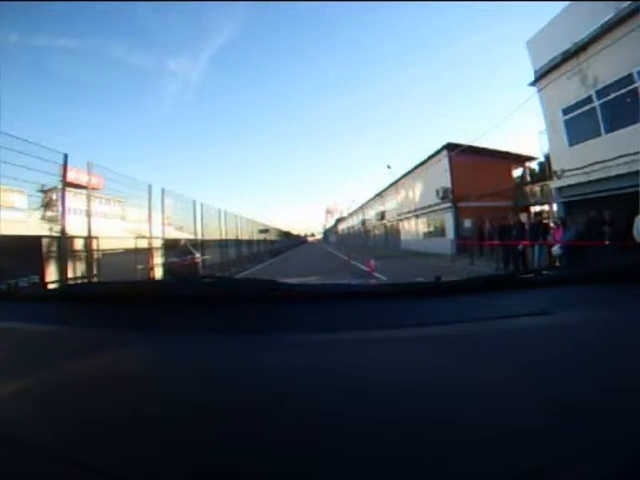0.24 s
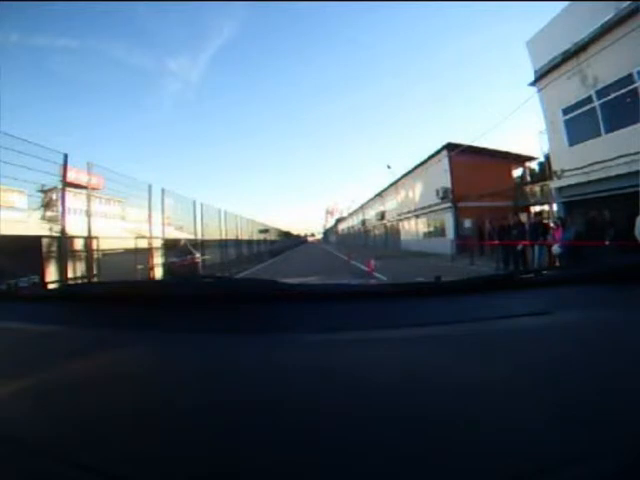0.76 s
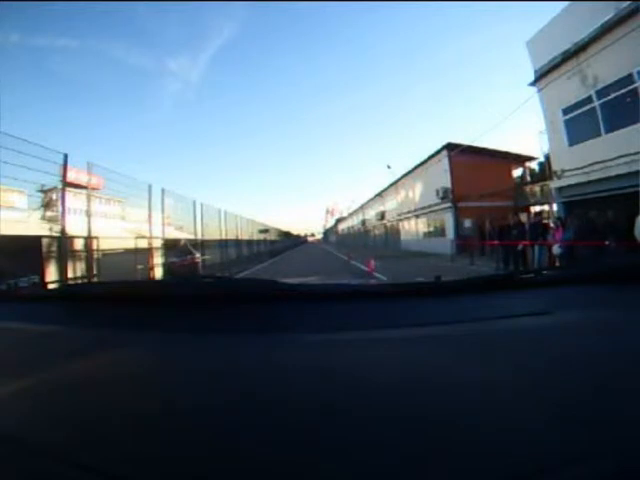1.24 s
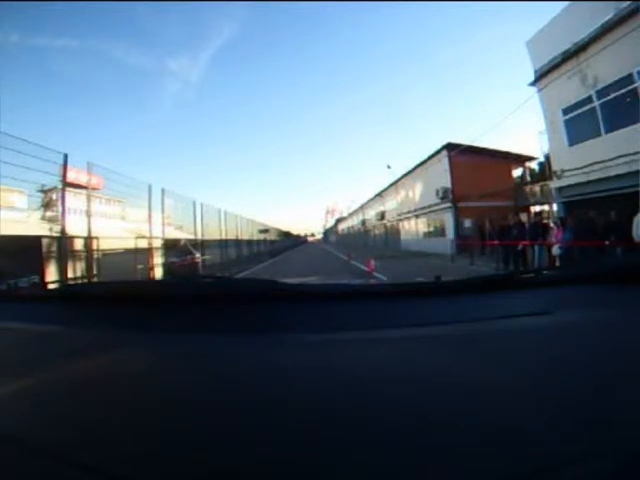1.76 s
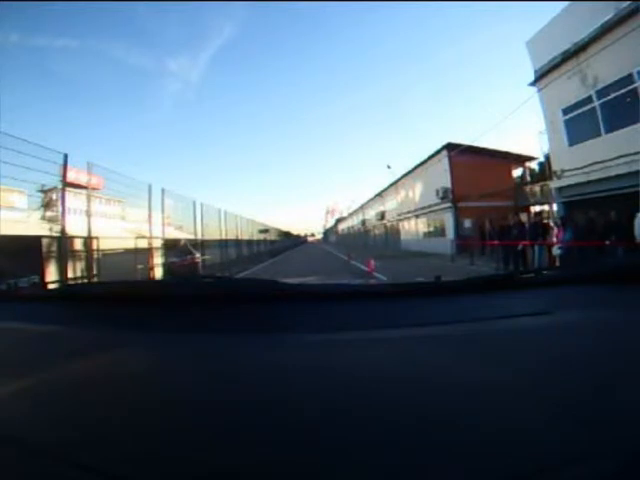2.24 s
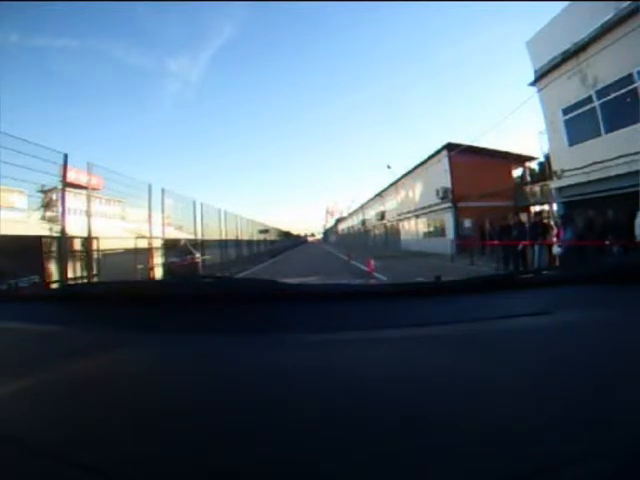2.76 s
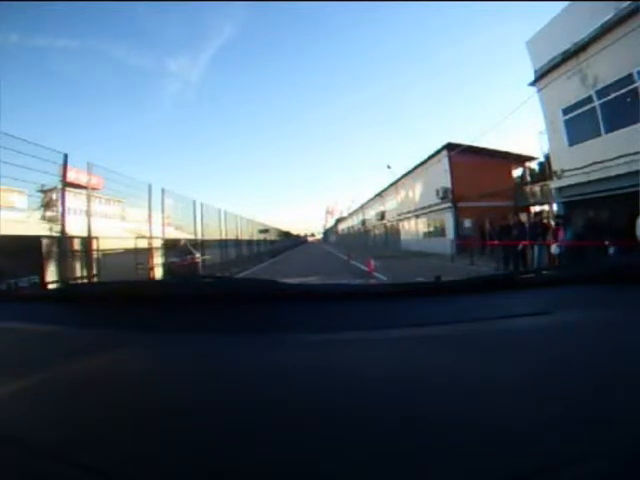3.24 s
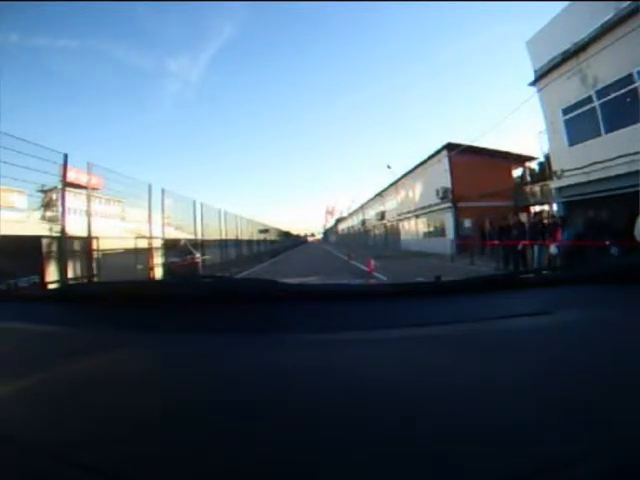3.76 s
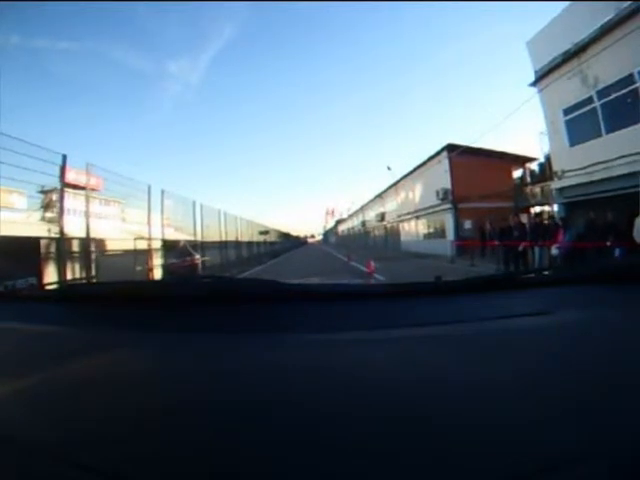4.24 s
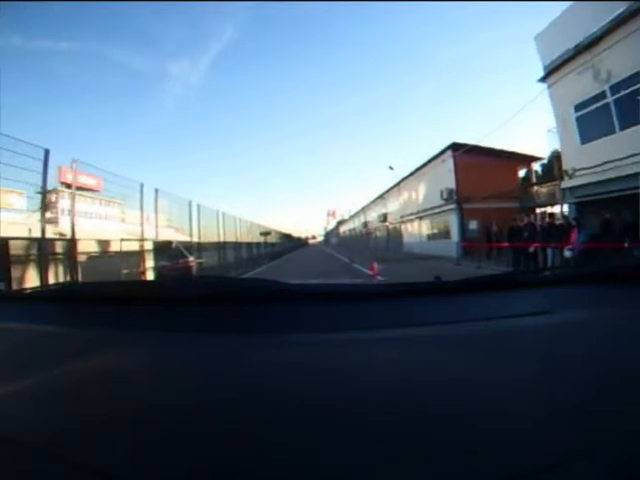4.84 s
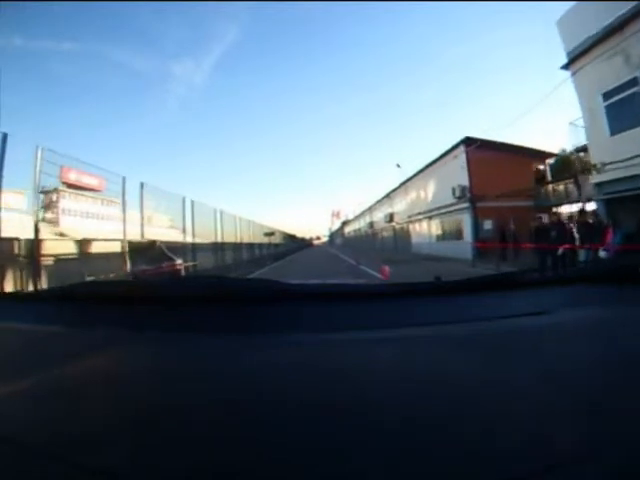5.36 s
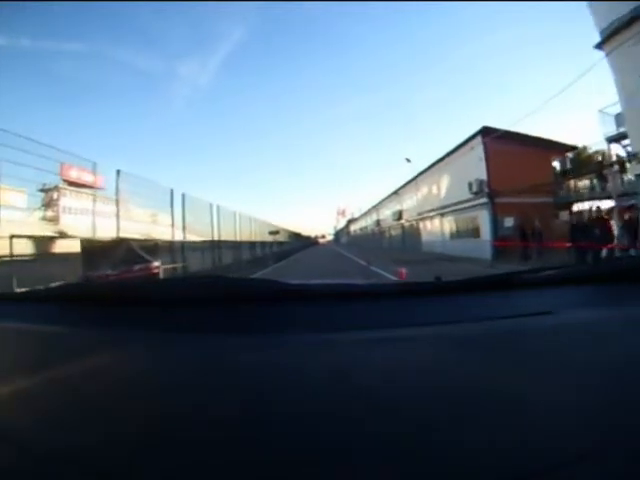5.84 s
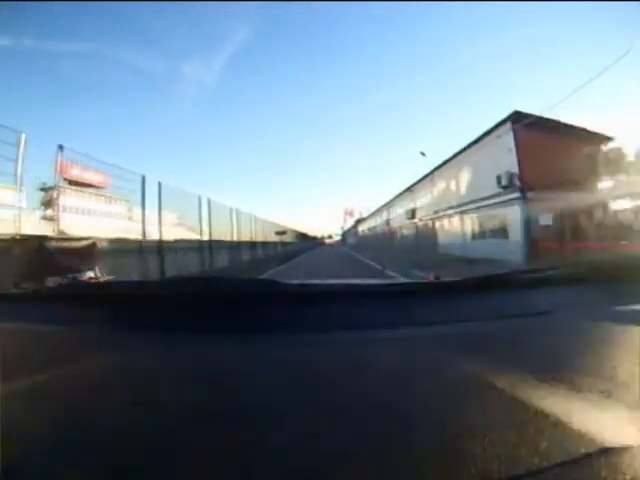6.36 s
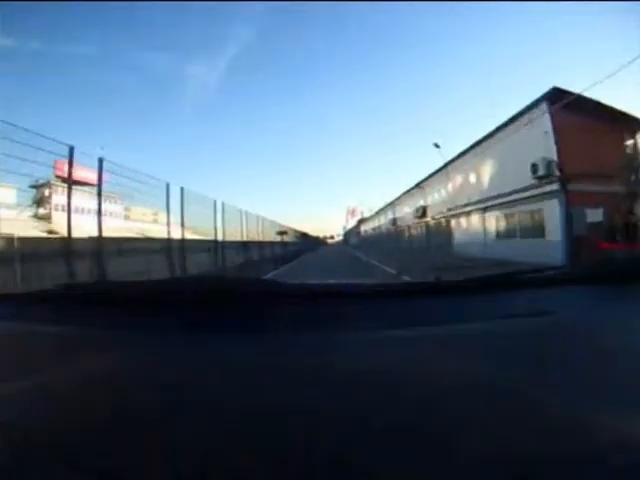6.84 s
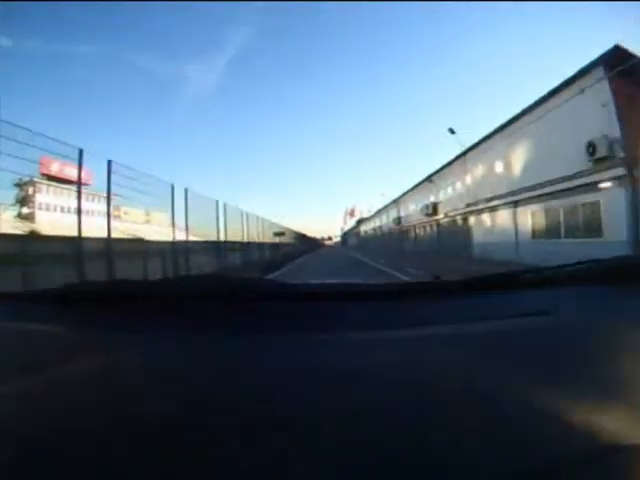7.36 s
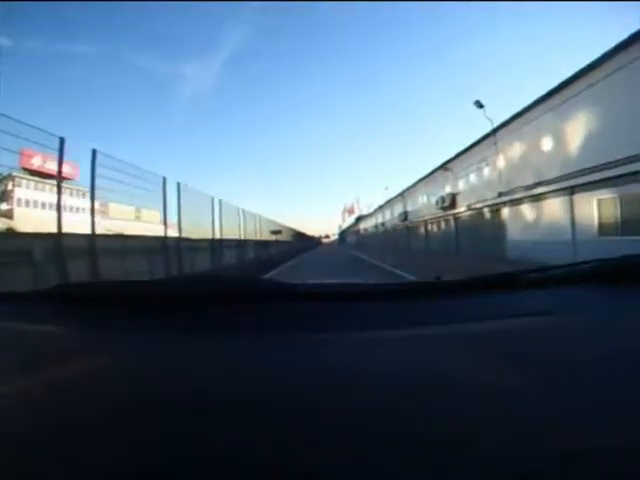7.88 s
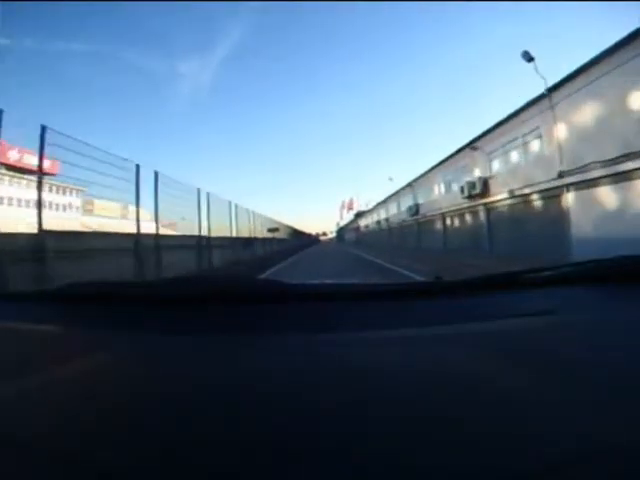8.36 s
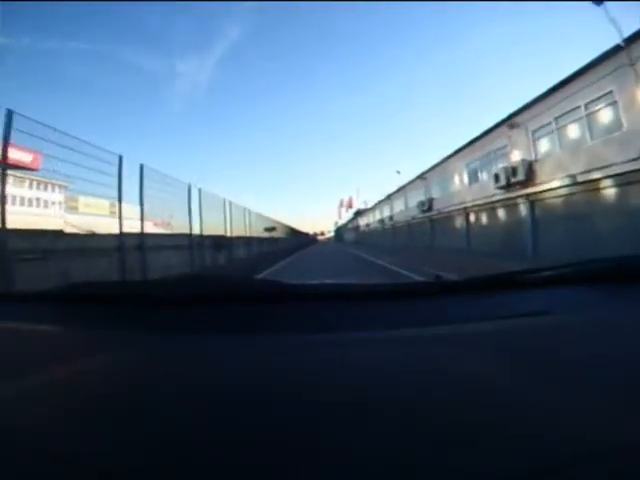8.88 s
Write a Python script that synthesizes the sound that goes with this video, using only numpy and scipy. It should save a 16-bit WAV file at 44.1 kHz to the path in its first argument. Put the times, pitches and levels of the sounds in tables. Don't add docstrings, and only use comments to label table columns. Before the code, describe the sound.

A dull, boomy cabin recording of a car waiting on a track: quiet deep idle, a second engine puttering close by, steady hiss. Dull lever knocks come first, then low clutch shudders, a quick rev and its fall with clicking trim. Acceleration follows, the engine swelling into a loud drone with road rumble and thin gear whine, rattles, repeated bumps and two hardest thumps near the end.

```python
import sys
import numpy as np
from scipy import signal
from scipy.fft import rfft, irfft
from scipy.io import wavfile
from scipy.ndimage import uniform_filter1d

SR = 44100
rng = np.random.default_rng(int(sys.argv[2]) if len(sys.argv) > 2 else 0)


def master(y):
    cut = np.clip(np.atleast_2d(y).T, -1, 1)
    pcm = np.round(cut * 32767)
    wavfile.write(sys.argv[1], SR, pcm.astype(np.int16))


def volts_from_db(level):
    exponent = np.asarray(level, float) / 20
    return 10 ** exponent


N = 401751
TIME = np.arange(N) / SR

# time_s, firing_hz
REVS = [(0, 21.5), (1.45, 21.8), (1.8, 27.8), (3.22, 28), (3.7, 50), (4.18, 67.6), (4.3, 66.8), (4.9, 47.9),
        (5.38, 36.2), (5.8, 37.7), (6.22, 47.8), (6.7, 60.7), (7.28, 83.2), (7.45, 86.5), (7.9, 103),
        (8.16, 109), (8.5, 100.7), (9.11, 79.5)]
# time_s, load_db
LOAD = [(0.0, -33), (1.34, -33.5), (1.81, -45), (3.19, -51), (3.51, -17.5), (3.77, -23), (4.46, -19),
        (4.58, -17), (5.29, -13), (5.42, -18.0), (5.91, -16), (6.25, -13.5), (6.76, -16.5), (7.16, -10),
        (7.39, -5), (8.46, -8), (8.7, -27), (9.11, -14.5)]
# level_db, load_share, unsteadiness_db, rise_db_per_octave of revs
MAIN_ORDERS = [(-0.55, 1, 1.04, 0.2), (-14, 0.67, 1.6, -1.5), (-28.5, .25, 1.1, 5), (-31.5, 0.4, 3, 9.5)]
# multiple of firing rate, level_db
MINOR_ORDERS = [(.5, -6), (1.5, 2), (2.5, -2), (3.5, 0), (4.5, -15), (5, 1.5), (5.5, -2.5), (6, 0.5),
                (6.5, -3.5), (7, -2.5), (8, -2), (9, 1)]
# freq_hz, gain_db
CABIN = [(20, 0), (120, -10.5), (170, -2.5), (210, -17), (260, -1), (305, -8.5), (340, -28), (450, -31),
         (600, -30), (780, -31), (900, -30.5)]
# freq_hz, width_hz, level_db
AIR_WITH = [(43.56, 11.6, 4), (54.1, 5.3, -5.5), (87.1, 25, -15.5), (102.4, 6.9, -14.5), (136, 8.8, -17.5),
            (171.8, 8.4, 1.3), (191.1, 11, -5.5), (220, 11, -9.5), (233, 12, -10), (246.7, 7.7, -3),
            (273.2, 12, -5.5)]
# freq_hz, width_hz, level_db
AIR_AGAINST = [(85.5, 4.3, -8), (119.8, 7.1, -14), (285, 15, -8)]
# freq_hz, density_db_per_hz
WHINE = [(2100, -29.5), (2250, -6), (2300, 1), (2360, -9.5), (2470, -1.5), (2560, -6.5), (2750, -37.5)]
# time_s, peak_db
STROKES = [(0, -31.5), (.4, -31), (.8, -30.5), (1.3, -29.5), (2, -32), (2.7, -31), (3.3, -30.5), (3.6, -41)]
# freq_hz, level_db, t60_s
STROKE_MODES = [(137, 0.5, 0.029), (260, -0.5, 0.016), (453, -5.5, 0.011), (728, -19, 0.01),
                (1060, -22, 0.021)]
# freq_hz, density_db_per_hz
RUMBLE = [(9, -34.5), (15, -15), (38, 3), (63, -2.5), (130, -2.5), (250, -3), (300, -10.5), (345, -25.5),
          (440, -25.5), (750, -29), (900, -40.5), (1300, -54)]
# freq_hz, density_db_per_hz
FIZZ = [(530, -33.5), (900, -5.5), (1250, -4.5), (1600, -5), (1850, -1.5), (2200, -5), (2470, -14.5),
        (2650, -3.5), (2920, -13), (3080, -4.5), (3400, -5.5), (3900, -12)]
# freq_hz, density_db_per_hz
HISS = [(210, -30), (350, -3.5), (423, -5), (560, -6), (658, -14.5), (691, -8), (1030, -18), (2300, -18),
        (3200, -17), (3830, -24), (4980, -53.5), (8430, -120)]
# start_s, peak_db, rebound_db
KNOCKS = [
    (1.237, -17.5, -8.5),
    (1.672, -28.5, -14.5),
    (1.688, -19, -3),
    (1.73, -27.5, -5.5),
    (8.396, -21, 4.5),
]
# freq_hz, level_db, t60_s
KNOCK_MODES = [(132.4, -8.5, 0.23), (165, 0.5, 0.064), (180, 6.5, 0.045), (232, -3, 0.089),
               (236, -22, 0.067), (748, -19.5, 0.029)]
# start_s, length_s, peak_db, ring_hz
BUMPS = [(2.801, 0.12, -22, 41.66), (2.896, 0.067, -22.5, 41.5), (2.97, .08, -28, 42.85),
         (3.05, 0.064, -34, 39.8), (3.989, 0.35, -44.5, 42), (6.8, 0.22, -27, 43.62),
         (6.992, .08, -31, 41.95), (7.075, 0.24, -24, 40.2), (7.281, 0.098, -22.5, 37),
         (7.39, 0.14, -20.5, 37.4), (7.51, 0.1, -26, 39.5), (7.614, .18, -20.5, 38.35),
         (7.799, 0.13, -23.5, 39.5), (7.887, .13, -21.5, 40.65), (8.027, .15, -21, 40.8),
         (8.168, 0.12, -23.5, 41.7), (8.286, 0.26, -21.5, 40.6), (8.483, .09, -29, 40.8),
         (8.584, 0.097, -13, 40.4), (8.663, 0.13, -11, 41.5), (8.737, 0.19, -18, 40.4),
         (8.96, 0.064, -27.5, 41.2), (9.02, 0.27, -24.5, 40.7)]
# start_s, length_s, level_db
SCUFF = (2.953, 0.038, -38.5)
# freq_hz, density_db_per_hz
SCRAPE = [(900, -19), (1700, -10), (2300, -1), (3000, -1.5), (3600, -5), (4000, -14.5)]
# start_s, peak_db
TICKS = [(4.6566, -29.5), (4.674, -29), (4.6962, -27), (4.713, -30.5), (4.7306, -29), (4.7496, -21),
         (4.79, -31.5), (4.829, -33.5), (4.8895, -24), (4.997, -33), (5.0177, -26), (5.0653, -28.5),
         (5.093, -40), (5.1173, -44), (5.1665, -32), (5.2152, -29.5), (5.24, -40), (5.259, -28.5),
         (5.293, -35), (6.2554, -26), (6.2761, -21), (8.09, -21.5), (8.115, -34), (8.1421, -33.5),
         (8.1698, -32), (8.2122, -19.5), (8.6579, -28.5), (8.6832, -28), (8.7151, -15), (8.758, -25)]
# time_s, peak_db
BUZZ = [(5.78, -30.5), (5.85, -25), (5.9, -24.5), (5.918, -29), (5.94, -19), (6.08, -20), (6.19, -23),
        (6.24, -26.5)]
# freq_hz, level_db, t60_s
TRIM_MODES = [(415, -16, 0.033), (1270, -23, 0.01), (1805, 0, 0.015), (2544, -6.5, 0.032),
              (2780, 8.5, 0.0059), (3074, 3.5, 0.011), (3270, 1.5, 0.0081), (3850, -9, 0.002)]
# start_s, end_s, first_db, last_db
CHATTER = [
    (4.92, 5.31, -42, -34.5),
    (6.18, 6.3, -30, -36),
    (8.095, 8.202, -50, -27),
]
IMAGES_DB = [-33.5, -38.5, -41.5, -44]


def evened(x):
    return x / np.sqrt(np.mean(x ** 2) + 1e-20)


def read(points, hz):
    f, value = np.transpose(points)
    return np.interp(np.log(hz + 1), np.log(f + 1), value)


def curve(rows):
    s, value = np.transpose(rows)
    return np.interp(TIME, s, value)


def add(mix, s, sound):
    part = mix[round(s * SR):][:len(sound)]
    part += sound[:len(part)]


def wander(top_hz):
    z = rfft(rng.standard_normal(N))
    hz = np.arange(len(z)) * SR / N
    return evened(irfft(z / (1 + (hz / top_hz) ** 4), N))


def noise(shape, patchy_db, size=2048):
    frames, hz = 4 * N // size + 5, np.fft.rfftfreq(size, 1 / SR)
    a, b, patches = rng.standard_normal((frames, len(hz), 3)).T
    patches = uniform_filter1d(patches, size=5, axis=0)
    patches = evened(uniform_filter1d(patches, size=5, axis=1))
    z = (a + 1j * b) * volts_from_db(read(shape, hz)[:, None] + patchy_db * patches)
    return evened(signal.istft(z, nperseg=size, noverlap=3 * size // 4)[1][:N])


def rung(modes, spread, rise_s, seconds=.08):
    t = np.arange(round(seconds * SR)) / SR
    ring = np.zeros(len(t))
    for (hz, db, t60), (a, b) in zip(modes, rng.standard_normal((len(modes), 2))):
        decay = volts_from_db(db + 1.3 * a - 60 * t / t60)
        ring += decay * np.sin(2 * np.pi * hz * (1 + spread * b) * t)
    ring *= 1 - np.exp(-(t / rise_s) ** 2)
    return ring / abs(ring).max()


def revs():
    flywheel_s = .16
    return uniform_filter1d(curve(REVS), size=round(flywheel_s * SR), mode="nearest")


def firings():
    trough_s = 6.038
    turns = np.cumsum(revs()) / SR
    return turns - turns[round(trough_s * SR)]


def air_modes(modes, hz):
    return sum(volts_from_db(db) / (1 + 2j * (hz - f) / width) for f, width, db in modes)


def cabin_db(hz):
    null_hz, null_width_hz, null_left = 61.3, 2.9, 0.06
    low_cut_hz, muffle_hz = 25.4, 320
    gain = 1 - (1 - null_left) / (1 + (2 * (hz - null_hz) / null_width_hz) ** 2)
    gain /= (1 + (low_cut_hz / hz) ** 4) * (1 + (hz / muffle_hz) ** 20)
    modes = air_modes(AIR_WITH, hz) - air_modes(AIR_AGAINST, hz)
    return 20 * np.log10(abs(modes * gain) + 1e-4)


def orders_db():
    hz, load = revs(), curve(LOAD)
    octaves = np.log2(hz / 58)
    return [db + share * load + rise_db * octaves + cabin_db((k + 1) * hz)
            for k, (db, share, _, rise_db) in enumerate(MAIN_ORDERS)]


def rumble_db():
    idle_hz, knee_hz = 21.5, 82.5
    roll_s, roll_full_s = 4.6, 2.9
    revs_db = 5.5 * np.log2(np.minimum(revs(), knee_hz) / idle_hz)
    load_db = 0.082 * (curve(LOAD) + 31.5)
    return -47.5 + revs_db + load_db + 1.35 * np.clip(TIME - roll_s, 0, roll_full_s)


def bumps():
    skew = 0.63
    return sum(volts_from_db(db) * np.sin(np.pi * np.clip((TIME - s) / d, 0, 1) ** skew) for s, d, db, _ in BUMPS)


def engine():
    hz = revs()
    swing = 2 * np.pi * (firings() + .42)
    out = np.zeros(N)
    for k, (db, (_, _, drift_db, _)) in enumerate(zip(orders_db(), MAIN_ORDERS)):
        level_db = db + drift_db * wander(8.9) + .8 * wander(25)
        out += volts_from_db(level_db) * np.cos((k + 1) * swing + k)
    minor_db = rumble_db() - 4
    for k, db in MINOR_ORDERS:
        phase = k * swing + 0.43 * wander(1.2) + rng.uniform(0, 2 * np.pi)
        level_db = minor_db + db + read(CABIN, k * hz) + 2.5 * wander(4.5)
        out += volts_from_db(level_db) * np.cos(phase)
    return np.sqrt(2) * out


def gear_whine():
    hz = revs()
    coasting = uniform_filter1d(1. * (np.gradient(hz) < 0), size=SR // 4)
    level_db = -52 + 8.5 * np.log2(hz / hz.max()) - 2.5 * coasting
    return volts_from_db(level_db + .7 * wander(20)) * noise(WHINE, patchy_db=-1.5)


def engine_close_by():
    strokes_per_s, first_s, jitter_s, spread_db = 26.25, .0156, .002, 1.6
    out = np.zeros(N)
    for s in np.arange(first_s, STROKES[-1][0], 1 / strokes_per_s):
        a, b = rng.standard_normal(2)
        peak_db = np.interp(s, *np.transpose(STROKES)) + spread_db * b
        add(out, s + jitter_s * a, volts_from_db(peak_db) * rung(STROKE_MODES, spread=.08, rise_s=.002))
    return out


def rumble():
    level = volts_from_db(rumble_db() + 1.84) + volts_from_db(-23.5) * bumps()
    return level * noise(RUMBLE, patchy_db=1.54, size=4096)


def fizz():
    smooth_s, least_db = 0.15, -53.5
    shake = uniform_filter1d(sum(volts_from_db(db) for db in orders_db()), round(smooth_s * SR))
    shaken_db = np.maximum(-38 + 0.54 * 20 * np.log10(shake), least_db)
    level = volts_from_db(shaken_db - 2.5) + volts_from_db(-39) * bumps()
    return level * volts_from_db(0.99 * wander(60)) * noise(FIZZ, patchy_db=-0.13, size=1024)


def microphone_hiss():
    return volts_from_db(-52.5) * noise(HISS, patchy_db=2.0, size=1024)


def knocks():
    out = np.zeros(N)
    for s, db, rebound_db in KNOCKS:
        blow = rung(KNOCK_MODES, spread=0.024, rise_s=0.0054, seconds=.15)
        add(out, s + 0.0018, volts_from_db(db + 4.5) * blow)
        rebound = rung(KNOCK_MODES, spread=.03, rise_s=.004, seconds=.15)
        add(out, s + .015, volts_from_db(db + rebound_db) * rebound)
    return out


def shell_ring():
    crest_s = 8.707
    start, length, _, hz = np.transpose(BUMPS)
    turns = np.cumsum(np.interp(TIME, start + length / 2, hz)) / SR
    return np.sqrt(2) * bumps() * np.cos(2 * np.pi * (turns - turns[round(crest_s * SR)]))


def scuff():
    start, length, db = SCUFF
    stroke = np.sin(np.pi * np.clip((TIME - start) / length, 0, 1))
    return volts_from_db(db) * stroke * noise(SCRAPE, patchy_db=1.5, size=256)


def trim():
    s, db = np.transpose(BUZZ)
    at = TIME[1:][np.diff(np.floor(firings())) > 0]
    at = at[(at > s[0]) & (at < s[-1])]
    strikes = list(TICKS) + list(zip(at, np.interp(at, s, db)))
    out = np.zeros(N)
    for when, peak_db in strikes:
        a, b, c = rng.standard_normal(3)
        strike = rung(TRIM_MODES, spread=0.0027, rise_s=0.00044)
        add(out, when + .0005 + 0.00019 * a, volts_from_db(peak_db - 1.64 * b) * strike)
        bounce = rung(TRIM_MODES, spread=.015, rise_s=.0004)
        add(out, when + .004 + .0006 * c, volts_from_db(peak_db - 12) * bounce)
    return out


def chatter():
    taps_per_s, spread_db = 95, 0.5
    spell = np.zeros(N)
    for a, b, first_db, last_db in CHATTER:
        spell += volts_from_db(np.interp(TIME, [a, b], [first_db, last_db])) * (TIME > a) * (TIME < b)
    taps = spell * volts_from_db(spread_db * rng.standard_normal(N)) * (rng.random(N) < taps_per_s / SR)
    kind = rng.integers(0, 4, N)
    out = np.zeros(N)
    for k in range(4):
        out += signal.oaconvolve(taps * (kind == k), rung(TRIM_MODES, spread=0.015, rise_s=0.00075))[:N]
    return out


def scene():
    mix = engine() + gear_whine() + engine_close_by()
    mix += rumble() + fizz() + microphone_hiss()
    mix += knocks() + shell_ring() + scuff() + trim() + chatter()
    return mix[None]


def low_pass(x):
    return signal.sosfilt(signal.butter(12, 15830, fs=SR, output="sos"), x)


def record(dry):
    clock_hz, fade_s = 3900.5, .005
    faded = dry * np.minimum((TIME[-1] - TIME) / fade_s, 1)
    band = signal.oaconvolve(faded, signal.firwin(801, clock_hz, fs=SR)[None], "same")
    slope = np.gradient(band, axis=1) * SR / (2 * np.pi * 1000)
    slip = np.zeros(N)
    for k, db in enumerate(IMAGES_DB):
        slip += 2 * volts_from_db(db) * np.cos((k + 1) * 2 * np.pi * clock_hz * TIME)
    return low_pass(band + slip * slope)


dry = scene()
out = record(dry)
master(out)
```